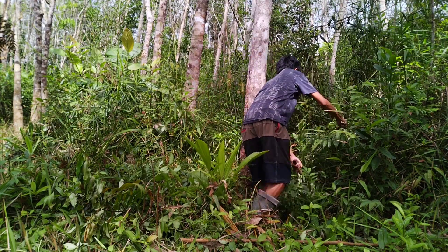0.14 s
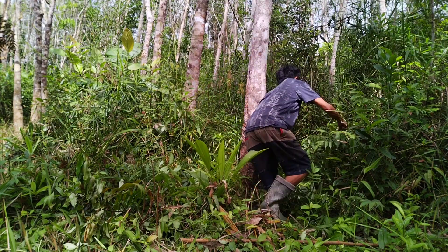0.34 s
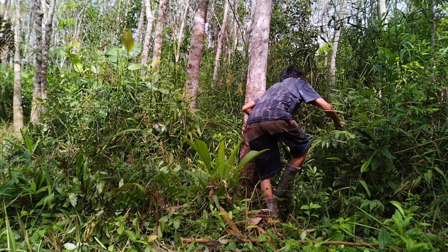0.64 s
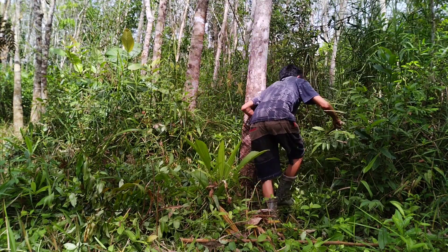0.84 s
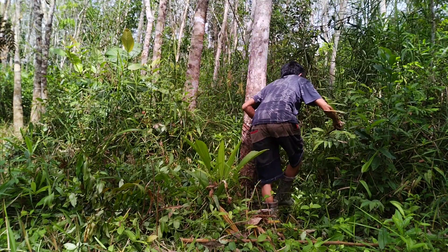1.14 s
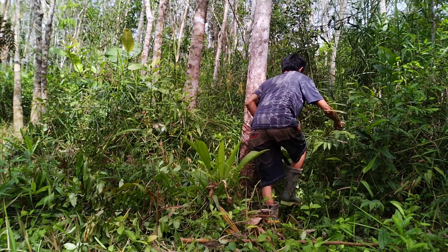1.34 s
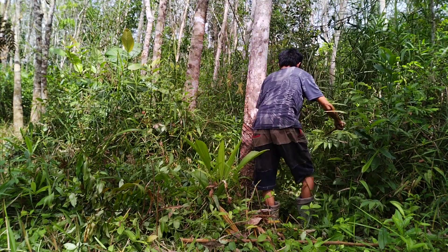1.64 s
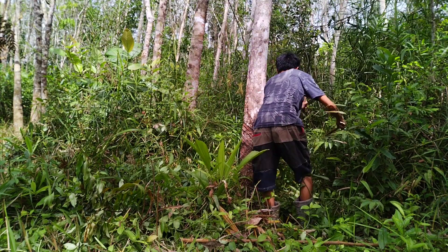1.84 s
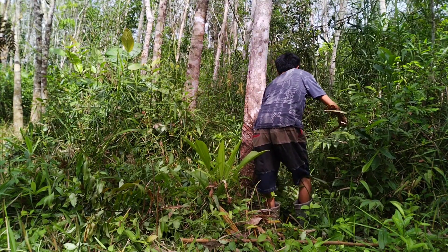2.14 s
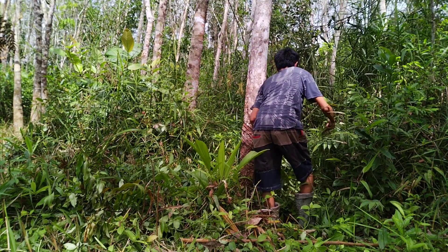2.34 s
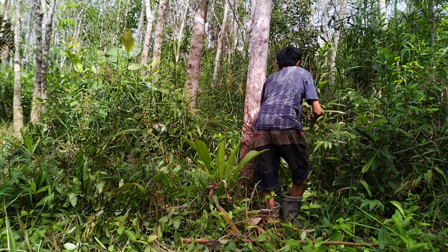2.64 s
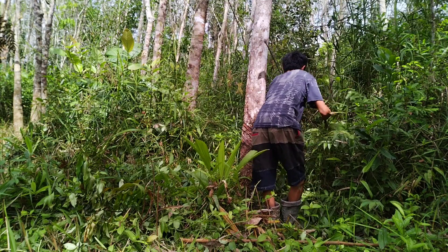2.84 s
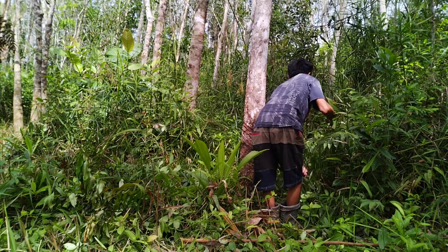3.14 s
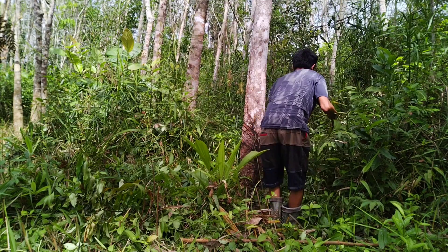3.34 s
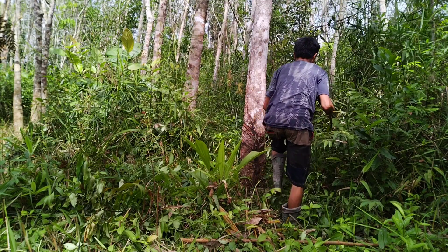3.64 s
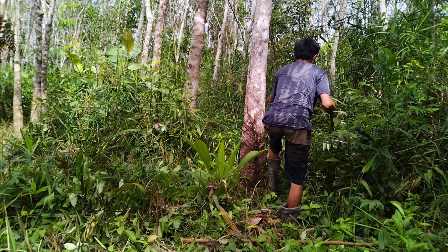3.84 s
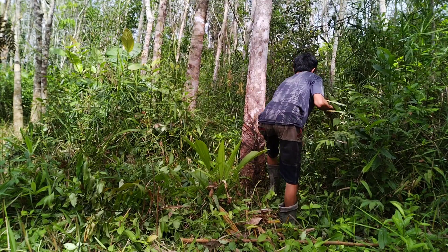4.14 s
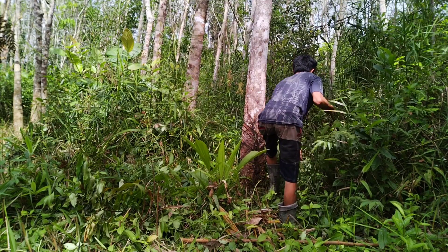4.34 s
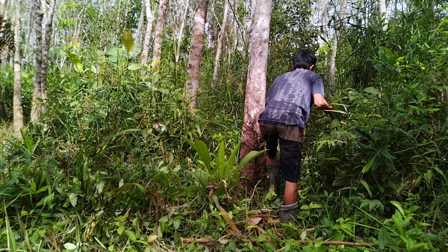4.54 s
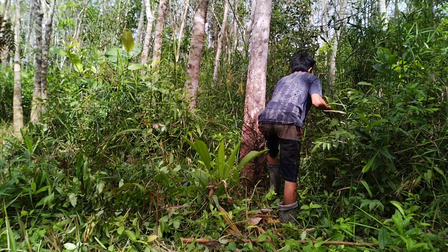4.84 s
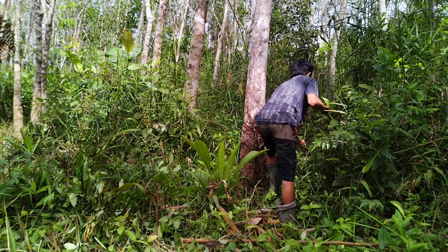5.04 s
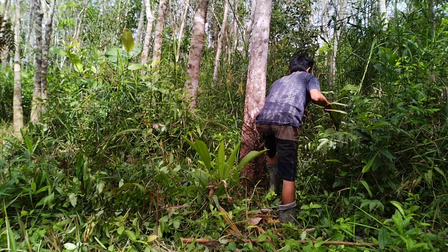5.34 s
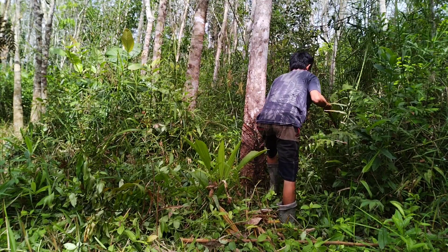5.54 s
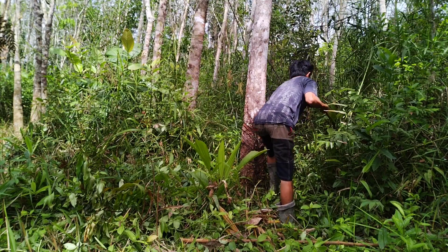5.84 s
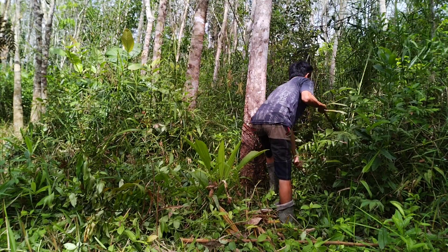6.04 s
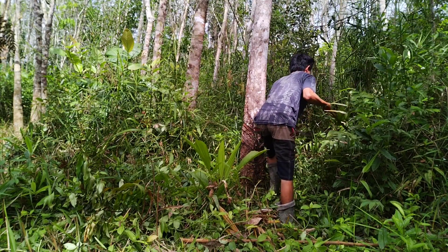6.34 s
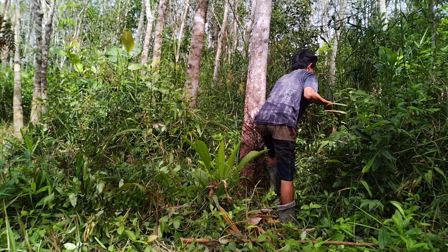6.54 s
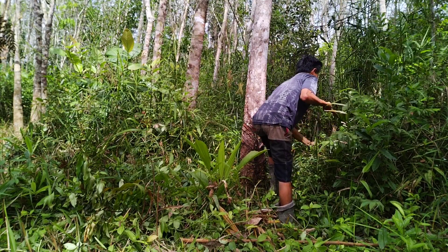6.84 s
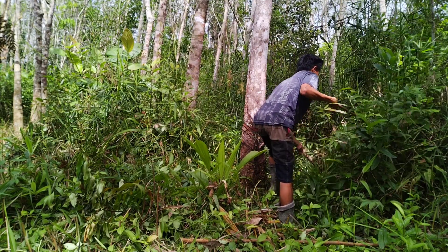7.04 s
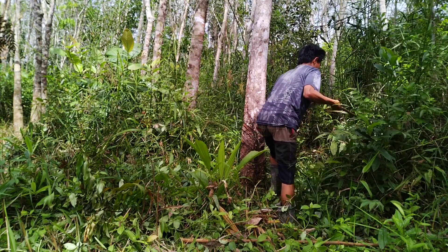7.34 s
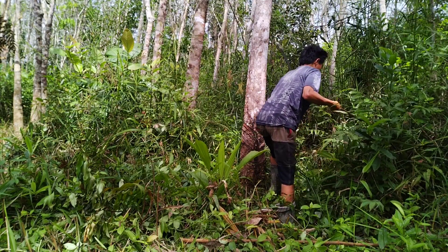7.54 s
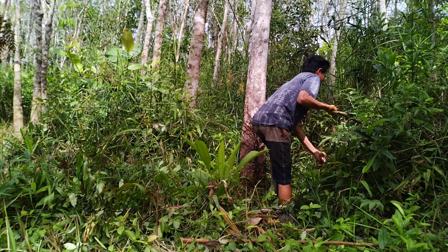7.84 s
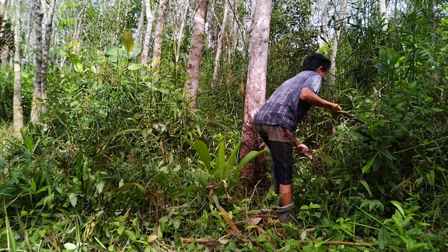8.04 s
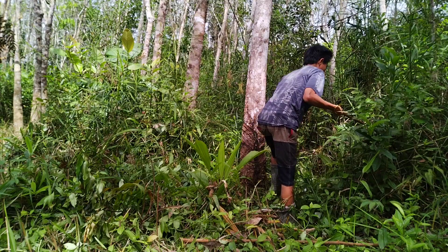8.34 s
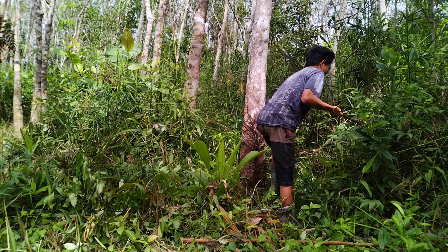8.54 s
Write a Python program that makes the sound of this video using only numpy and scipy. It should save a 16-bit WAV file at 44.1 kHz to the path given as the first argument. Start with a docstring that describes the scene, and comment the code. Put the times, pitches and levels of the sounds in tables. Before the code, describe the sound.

A few metres away in a tropical grove, a machete slashes through undergrowth. One early stroke is followed by trodden, rustling leaves, then seven strokes come about a second apart, each a sharp leafy crackle with snapping stems and dull knocks. Cicadas drone high and constantly, one whining at intervals, and a small bird chirps. Plain mono phone microphone, dry and open.

```python
"""In a tropical grove, a long blade slashes through undergrowth a few metres from a mono phone microphone.
Each stroke is a burst of leaf crackle in three ranges, with ringing stem snaps and dull, sagging knocks.
Boots rustle in between, as patchy crackle. Overhead, cicadas drone as bands of dense clicks, buzz as
pulsed rings of noise and whine as falling tones; a small bird calls in near-sine arches and falls."""
import sys
import numpy as np
from scipy import signal
from scipy.fft import rfft, irfft
from scipy.io import wavfile
from scipy.ndimage import uniform_filter1d

SR = 44100
rng = np.random.default_rng(int(sys.argv[2]) if len(sys.argv) > 2 else 0)


def int16_out(signal):
    """Quantize to a 16-bit WAV file."""
    q = np.round(np.clip(np.atleast_2d(signal).T, -1, 1) * 32767)
    wavfile.write(sys.argv[1], SR, q.astype(np.int16))


N = 382327
T = np.arange(N) / SR  # s
F = np.arange(N // 2 + 1) * SR / N + 1e-3  # Hz, kept off zero for the logarithm

# All levels are those of the sources, ahead of the microphone.
# Air and far leaves. Each row: frequency in Hz, gain in dB.
GROVE_COLOUR = [(25, 6.5), (60, 6), (150, -5.5), (400, -11), (1000, -14), (2500, -20), (5000, -10.5),
                (11000, -22.5), (16000, -4)]
GROVE_DB = -63  # before it wanders

# Choir of cicadas, pitches spread around a centre.
# Each row: centre in Hz, spread in Hz, level in dB before it flickers.
CHOIR = [(7054, 357, -48.5), (8470, 690, -64.5), (12570, 240, -56.5), (14220, 910, -50)]
# Rings of the nearer, buzzing cicada. Each entry: centre in Hz.
BUZZ_RINGS_HZ = [3080, 9400, 12568, 12500]
# The same rings in the same order. Each row: width in Hz, level in dB before the beat.
BUZZ_RINGS = [(340, -71), (150, -75), (50, -58), (250, -59)]
# Beat of the buzz. Each row: time in seconds, pulses a second before they wander.
BUZZ_BEAT = [(0, 75), (4.0, 73), (4.7, 68), (6.5, 84.3), (8.67, 76)]
BUZZ_TONE_HZ, BUZZ_WANDER_HZ, BUZZ_TONE_DB = 3200, 30, -66

# Foliage brushed or trodden between strokes.
# Each row: loudest moment in seconds, level in dB, rise and fall in seconds per 20 dB, bass in dB re level.
RUSTLES = [(.005, -71.5, .1, 0.14, 9), (.43, -65, 0.14, 0.22, 6.5), (.79, -59.5, .3, 0.14, 3),
           (1.42, -67.5, 0.62, 0.45, 4), (1.25, -73, .1, 0.11, -6), (1.65, -59.5, 0.14, 0.19, 3),
           (2.47, -72.5, .4, 0.59, 5), (2.75, -69, 0.93, 0.35, 6), (3.0, -65.5, 0.16, 0.24, 3),
           (3.47, -64.5, 0.22, .2, 9), (3.56, -67.5, 0.11, 0.18, 11), (3.95, -71.5, 0.65, 0.42, 8),
           (4.6, -72.5, 0.44, .2, 8), (5.43, -67.5, 0.17, 0.16, 5), (6.85, -75, 0.49, 0.22, 0)]
RUSTLE_TREBLE_DB = 3
STIR_DB, STIR_BASS_DB, STIR_TREBLE_DB = -81, -0.5, 5.5  # leaves never rest completely
# foliage springs back after each stroke
SETTLE_T60_S, TREBLE_SETTLE_T60_S = 1.41, 1.36
SETTLE_BASS_DB, SETTLE_TREBLE_DB = -1, 6.5
# Colour of close leaves. Each row: frequency in Hz, gain in dB.
LEAF_COLOUR = [(40, -3.5), (150, -5.5), (450, -4.5), (1200, -3.5), (2500, -1), (5000, -1), (9000, -1.5),
               (12000, -3), (16000, 3)]

# Arched bird notes.
# Each row: turn in seconds, start in Hz, top in Hz, rise in seconds, fall in seconds, level in dB.
BIRD_ARCHES = [(.095, 3750, 5450, .068, .055, -61), (.815, 4050, 5150, .043, .065, -61),
               (1.615, 4000, 5300, .045, .05, -62), (3.925, 4200, 4300, .045, .055, -69.5),
               (5.922, 4050, 5250, .042, .065, -72), (6.745, 3950, 5350, .04, .07, -67),
               (7.515, 3900, 5400, .043, .06, -66.5), (8.25, 4050, 5350, .038, .066, -63)]
ARCH_END_HZ = 3750
# Falling bird notes. Each row: start in seconds, start in Hz, level in dB.
BIRD_FALLS = [(.468, 5750, -62), (1.173, 5900, -61.5), (1.9, 4120, -68), (4.967, 4950, -73),
              (5.558, 5500, -72.5), (6.39, 5450, -70), (7.877, 5550, -67), (8.577, 5600, -64.5)]
# the fall slows below the knee
FALL_KNEE_HZ, FALL_TO_HZ, STEEP_HZ_PER_S, SLOW_HZ_PER_S = 4700, 3450, 40000, 21500

# Phrases of the whining cicada. Each row: start in seconds, length in seconds, level in dB.
WHINE_PHRASES = [(.08, 0.91, -57.5), (1.565, .88, -58), (3.0, 0.9, -59), (4.46, 0.7, -58),
                 (5.936, .9, -57.5), (7.37, .97, -60)]
# Pitch shared by the phrases. Each row: time into the phrase in seconds, pitch in Hz.
WHINE_PITCH = [(0, 11750), (.25, 11605), (.55, 11475), (1.0, 11360)]
WHINE_LOW_HZ, WHINE_LOW_DB = 350, -13  # the weaker tone: how far below, and its level re the upper one

# Strokes of the blade. Each row: start in seconds, level in dB, first bite in dB re level, rise in seconds,
# sweep in seconds, fall by 60 dB in seconds, bass and treble in dB re level, settling foliage in dB.
STROKES = [(0.172, -46.5, -4, 0.026, 0.018, 0.37, 5, 2.5, -62),
           (2.078, -49.5, -2, 0.028, 0.015, 0.16, 7, 6, -65),
           (3.164, -47, -3, 0.0078, 0.032, 0.15, 5, 5, -59),
           (4.262, -46, -4.5, 0.014, 0.024, 0.19, 4, 6.5, -58.5),
           (5.153, -46.5, -8.5, 0.026, 0.019, 0.36, 1.5, 4.5, -65),
           (6.048, -50.5, -7, 0.0092, 0.053, 0.19, 0.5, 4.5, -56),
           (6.953, -42.5, -12, 0.0063, 0.026, 0.19, 3, 4, -53),
           (7.931, -41.5, -11, 0.0089, 0.024, 0.27, -2, 4, -57.5)]

# Stems that snap, 1 ms after the start.
# Each row: start in seconds, force on the knock in dB, on the crack and the tick in dB re the knock.
SNAPS = [(0.18, -34.5, 7.5, 1.5), (0.213, -41, -5, -1.5), (0.252, -43, -5, -1), (1.758, -50, 10.5, -3),
         (2.083, -35.5, -12, 6), (2.097, -45, -7, 3.5), (2.974, -39.5, 13, 7), (3.021, -44, -18, -5.5),
         (3.082, -39.5, -4, -5), (3.15, -43, -5, 6), (3.171, -30.5, -19, 8), (3.199, -22.5, -24, -6),
         (4.251, -46, -13, 9), (4.268, -43, 1.5, 7.5), (4.301, -39, -4, 4.5), (5.154, -42, -5, 3.5),
         (5.181, -33, -25, -3.5), (6.049, -49, -2.5, 11.5), (6.066, -43, -6, -1.5), (6.093, -31.5, -6, -8),
         (6.961, -32, -5, 6), (6.983, -44, -3, 2.5), (7.327, -46.5, -11, -.6), (7.935, -37, -13, 9)]
# Knock, crack and tick of a stem. Each row: frequency in Hz, width in Hz.
STEM_RINGS = [(1500, 2200), (4500, 3000), (10000, 2300)]

# Dull thuds of blade and boots on wood and soil. Each row: start in seconds, level in dB,
# nominal pitch in Hz, thump, deep mode and ring in dB re level.
KNOCKS = [(.181, -55, 352, -15, -9, -15), (0.226, -37.5, 377, -15, -27, -15),
          (.95, -49.5, 158, -18, -25, -18), (2.086, -39, 430, -19, -20, -17),
          (2.11, -30, 366, -10, -25, -6), (2.466, -53, 430, -21, -20, -15),
          (3.197, -35, 355, -9.5, -16, -15), (4.275, -43, 320, -18, -16, -15),
          (4.298, -45, 300, -18, -20, -17), (5.174, -38, 388, -13, -20, -12), (6.094, -40, 347, 1, -7, -15),
          (6.96, -46.5, 340, -10, 2, 12), (6.978, -39.5, 202, -15, -24, -12),
          (7.935, -49, 149, -13, -15, -15), (7.964, -39, 434, -29, -24, -15)]
THUMP_RATIO, DEEP_RATIO, RING_RATIO = 0.432, 0.234, 3.5  # other modes of a blow, as multiples of its pitch
KNOCK_CYCLES, SHORTEST_T60_S = 17.8, 0.056  # 60 dB of decay, in cycles of each mode's own frequency; at least so long

TRUNKS_T60_S, TRUNKS_DB = 0.066, -4  # echoes of snaps and knocks
PORT_HZ, PORT_WIDTH_HZ, PORT_DB = 9175, 1000, 13.5  # resonance of the microphone port
TOP_HZ = 15440


def undb(db):
    return 10 ** (np.asarray(db) / 20)


def level(x, db):
    """Scale to an RMS level in dB."""
    return x * undb(db) / np.sqrt(np.mean(x ** 2))


def shape(x, gain):
    """Filter by a gain given for every frequency."""
    return irfft(rfft(x) * gain, N)


def colour(points):
    """Gain at every frequency, drawn straight in dB over log frequency."""
    hz, db = np.transpose(points)
    return undb(np.interp(np.log(F), np.log(hz), db))


def walk(rate):
    """Random values held 1 / rate s and slewed twice; spread near 1."""
    hold = int(SR / rate)
    steps = np.repeat(rng.standard_normal(N // hold + 1), hold)
    return 1.3 * uniform_filter1d(uniform_filter1d(steps, hold), hold)[:N]


def add(out, s, x):
    """Lay a sound into out from s seconds on."""
    i = int(s * SR)
    out[i:i + len(x)] += x[:N - i]


def tone(hz):
    """Sine that follows a pitch given for every sample."""
    return np.sin(2 * np.pi * np.cumsum(hz) / SR)


def fading(rate, depth):
    """Many paths through moving leaves add and cancel: a steady share plus a random one."""
    return np.sqrt(1 - depth) + np.sqrt(depth) * walk(rate)


def scatter(x, t60, db):
    """Dense echoes from trunks and leaves: decaying noise added to the direct sound."""
    t = T[:SR // 4]
    echo = rng.standard_normal(len(t)) * undb(-60 * t / t60)
    echo /= np.sqrt(np.sum(echo ** 2))
    return x + undb(db) * signal.fftconvolve(x, echo)[:N]


def crackle(rate, spread_db, hiss):
    """Random ticks of very uneven size, rate a second, each a tiny rasp, over a hiss."""
    size_db = np.minimum(spread_db * rng.exponential(size=N), 4 * spread_db)
    ticks = (rng.random(N) < rate / SR) * undb(size_db)
    # tails fade to about a third every 0.3 ms
    tails = signal.lfilter([1], [1, -np.exp(-1 / (.0003 * SR))], ticks)
    rasps = tails * rng.standard_normal(N)
    return level(rasps, 0) + hiss * rng.standard_normal(N)


def leaves(rate, spread_db, hiss):
    """Leaf crackle as bass, middle and treble, partly from different leaves; 0 dB in the mid band."""
    bass, treble = 1 / (1 + (F / 600) ** 4), 1 / (1 + (5500 / F) ** 4)
    shared = crackle(rate, spread_db, hiss)
    parts = []
    for gain in (bass, 1 - bass - treble, treble):
        mixed = 0.58 * shared + 0.85 * crackle(rate, spread_db, hiss)
        parts.append(shape(mixed, gain * colour(LEAF_COLOUR)))
    mid_band = (F > 700) & (F < 2700)
    return np.array(parts) / np.std(shape(parts[1], mid_band))


def grove():
    """Faint air and far leaves as coloured noise; the bass wanders on its own."""
    air = level(shape(rng.standard_normal(N), colour(GROVE_COLOUR)), GROVE_DB)
    low = shape(air, 1 / (1 + (F / 150) ** 4))
    return (air - low) * undb(.8 * walk(3)) + low * undb(1.5 * walk(5))


def cicadas():
    """Dense clicks of many singers blur into bands; a nearer one beats its rings in even pulses."""
    choir = np.zeros(N)
    for hz, spread, db in CHOIR:
        band = shape(crackle(8000, 1.1, 1.0), np.exp(-((F - hz) / spread) ** 2 / 4))
        choir += level(band, db) * undb(0.52 * walk(11))

    rate = np.interp(T, *np.transpose(BUZZ_BEAT)) * (1 + 0.0248 * walk(5.4))
    beat = tone(rate)
    buzz = np.zeros(N)
    for hz, (width, db) in zip(BUZZ_RINGS_HZ, BUZZ_RINGS):
        ring = 1 / (1 + (2 * (F - hz) / width) ** 2)
        buzz += level(shape(rng.standard_normal(N), ring), db)

    # beside the lowest ring, nearly a tone whose pitch wanders
    wandering = tone(BUZZ_TONE_HZ + BUZZ_WANDER_HZ * walk(320))
    wandering = level(wandering * fading(30, .05) * (1 + .4 * beat), BUZZ_TONE_DB)
    return choir + (1 + .5 * beat) * buzz + wandering


def range_power(db, bass_db, treble_db):
    """Power of bass, middle and treble."""
    return undb([[db + bass_db], [db], [db + treble_db]]) ** 2


def rustle():
    """Patchy crackle of foliage that stirs, settles or is trodden; each range flickers on its own."""
    power = range_power(STIR_DB, STIR_BASS_DB, STIR_TREBLE_DB) * np.ones(N)
    t60 = np.array([[SETTLE_T60_S], [SETTLE_T60_S], [TREBLE_SETTLE_T60_S]])
    for s, *_, db in STROKES:
        decay = undb(-60 * np.abs(T - s) / t60) ** 2
        power += range_power(db, SETTLE_BASS_DB, SETTLE_TREBLE_DB) * (T > s) * decay
    for s, db, rise, fall, bass_db in RUSTLES:
        swell = undb(-20 * np.maximum((s - T) / rise, (T - s) / fall)) ** 2
        power += range_power(db, bass_db, RUSTLE_TREBLE_DB) * swell
    patchy = undb([2.5 * walk(30), 1.77 * walk(45), 1.7 * walk(60)])
    return np.sum(np.sqrt(power) * patchy * leaves(600, 2.4, 1.0), axis=0)


def bird():
    """Near-sine arches and falls, each faded in and out, broken up and blurred by the distance."""
    notes = []  # times in s, pitches in Hz, level in dB
    for s, start_hz, top_hz, rise, fall, db in BIRD_ARCHES:
        notes.append(([s - rise, s, s + fall], [start_hz, top_hz, ARCH_END_HZ], db))
    for s, hz, db in BIRD_FALLS:
        knee_hz = min(hz, FALL_KNEE_HZ)
        knee_s = s + (hz - knee_hz) / STEEP_HZ_PER_S
        end_s = knee_s + (knee_hz - FALL_TO_HZ) / SLOW_HZ_PER_S
        notes.append(([s, knee_s, end_s], [hz, knee_hz, FALL_TO_HZ], db))
    out = np.zeros(N)
    for s, hz, db in notes:
        t = np.arange(s[0], s[-1], 1 / SR)
        fade = np.clip(np.minimum(t - s[0], s[-1] - t) / .01, 0, 1)
        add(out, s[0], fade * undb(db) * tone(np.interp(t, s, hz)))
    return scatter(out * fading(250, .15), .12, -4.0)


def whine():
    """A thin falling cicada tone with a weaker one below, both broken into short throbs."""
    upper, lower = np.zeros((2, N))
    for s, length, db in WHINE_PHRASES:
        t = T[:int(length * SR)]
        hz = np.interp(t, *np.transpose(WHINE_PITCH)) + 14 * walk(90)[:len(t)]
        swell = undb(db) * np.sin(np.pi * t / length) ** 0.31
        add(upper, s, swell * tone(hz))
        add(lower, s, swell * tone(hz - WHINE_LOW_HZ))
    return upper * fading(80, .3) + undb(WHINE_LOW_DB) * lower * fading(45, .6)


def slashes():
    """The blade brushes the first leaves, bites, digs deeper and sweeps through; then the leaves fall still."""
    gain = np.zeros((3, N))
    bite_s = np.array([[.01], [.005], [.003]])  # thick stems answer later than thin leaves
    for s, db, bite_db, rise, sweep, t60, bass_db, treble_db, _ in STROKES:
        t = T - s
        dig_db = bite_db * np.clip(1 - t / rise, 0, 1)
        fall_db = -60 * np.clip(t - rise - sweep, 0, None) / t60
        brush = 0.3 * np.exp(np.minimum(t, 0) / 0.026)  # grows ahead of the bite
        onset = np.maximum(np.clip(t / bite_s, 0, 1), brush)
        gain += undb([[db + bass_db], [db], [db + treble_db]]) * onset * undb(dig_db + fall_db)
    flicker = undb(0.67 * walk(120))
    return np.sum(gain * flicker * leaves(2500, 2.9, 0.92), axis=0)


def snaps():
    """A stem breaks within a millisecond, splinters follow; both ring its knock, crack and tick."""
    force, t = np.zeros((3, N)), T[:SR // 25]
    for s, db, crack_db, tick_db in SNAPS:
        fracture = .6 * np.exp(-t / .0005) + .09 * np.exp(-t / .003)  # break, then splinters
        burst = rng.standard_normal(len(t)) * fracture
        burst[0] = 1
        for row, part_db in zip(force, (db, db + crack_db, db + tick_db)):
            add(row, s + .001, undb(part_db) * burst)
    out = np.zeros(N)
    for row, (hz, width) in zip(force, STEM_RINGS):
        b, a = signal.iirpeak(hz, hz / width, fs=SR)
        out += signal.lfilter(b, a, row) / b[0] / 2  # a unit impulse starts the ring at one half
    return out


def knocks():
    """Soft blows: low rings that build within a few milliseconds, sag in pitch and die."""
    out, t = np.zeros(N), T[:SR // 4]
    # pitch sags from 1.06 to 0.75 of nominal
    cycles = 0.747 * t + 0.257 * 0.0401 * (1 - np.exp(-t / 0.0327))
    build = 1 - np.exp(-t / 0.0029)
    for s, db, pitch_hz, *modes_db in KNOCKS:
        for ratio, mode_db in zip((1, THUMP_RATIO, DEEP_RATIO, RING_RATIO), [0] + modes_db):
            hz = ratio * pitch_hz
            t60 = max(KNOCK_CYCLES / hz, SHORTEST_T60_S)
            decay = undb(db + mode_db - 60 * t / t60)
            add(out, s, decay * build * np.sin(2 * np.pi * hz * cycles))
    return out


def scene():
    """All sources at the microphone, the same in both channels."""
    backdrop = grove() + cicadas() + bird() + whine()
    foliage = rustle() + slashes()
    wood = scatter(snaps() + knocks(), TRUNKS_T60_S, TRUNKS_DB)
    mono = backdrop + foliage + wood
    return np.array([mono, mono])


def record(dry):
    """The microphone port rings near 9 kHz; the top is cut steeply."""
    b, a = signal.iirpeak(PORT_HZ, PORT_HZ / PORT_WIDTH_HZ, fs=SR)
    wet = dry + (undb(PORT_DB) - 1) * signal.lfilter(b, a, dry)
    top_cut = signal.ellip(16, .3, 75, TOP_HZ, fs=SR, output="sos")
    return signal.sosfilt(top_cut, wet)


dry = scene()
out = record(dry)
int16_out(out)
```